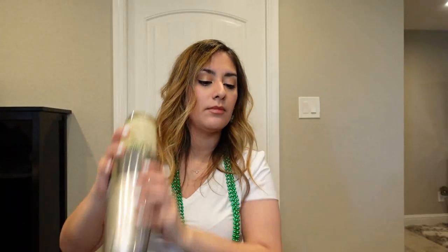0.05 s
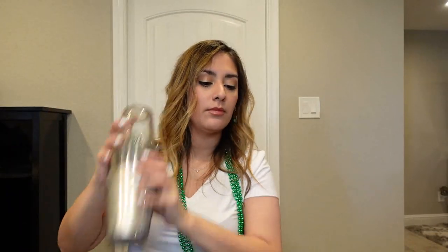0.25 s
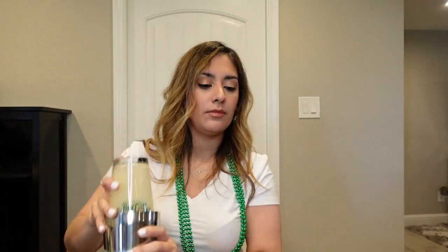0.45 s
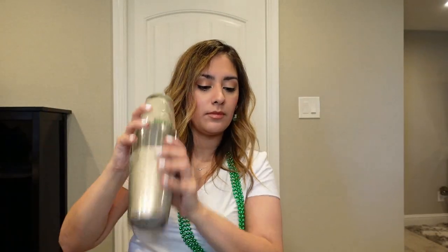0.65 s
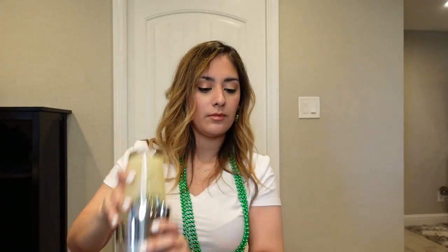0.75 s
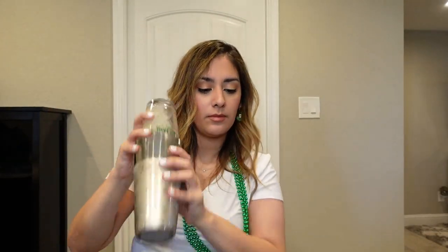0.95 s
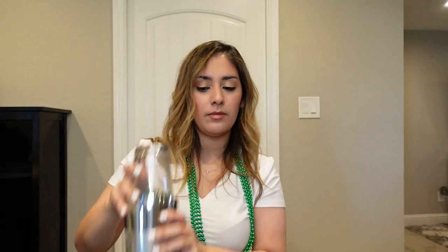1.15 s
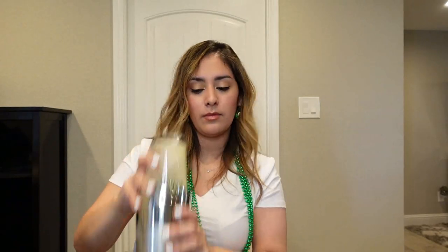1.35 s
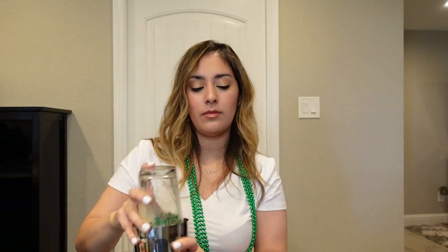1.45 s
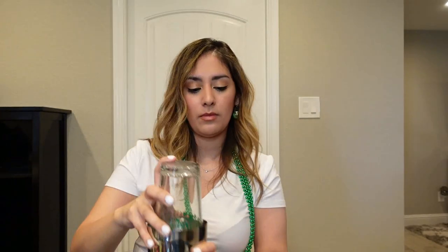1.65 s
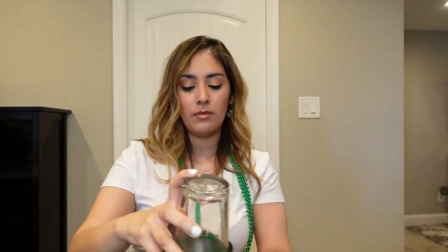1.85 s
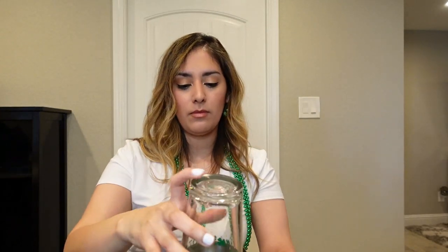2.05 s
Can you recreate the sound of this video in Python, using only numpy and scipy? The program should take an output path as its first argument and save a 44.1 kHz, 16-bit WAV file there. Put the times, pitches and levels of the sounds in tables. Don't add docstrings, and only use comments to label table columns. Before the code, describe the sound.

Fast cocktail shaking, ice cubes clattering against steel and glass, ending with a few last small rattles

```python
import sys
import numpy as np
from scipy import signal
from scipy.fft import rfft, irfft
from scipy.io import wavfile

SR = 44100
rng = np.random.default_rng(int(sys.argv[2]) if len(sys.argv) > 2 else 0)


def boost_factor(decibels):
    exponent = np.asarray(decibels, float) / 20
    return 10 ** exponent


def master_out(mix):
    frames = np.transpose(np.atleast_2d(mix))
    ceiling = np.clip(frames, -1, 1)
    pcm = np.round(ceiling * 32767).astype(np.int16)
    wavfile.write(sys.argv[1], SR, pcm)


N = 92742

# pitch_hz, level_db (per Hz)
HUM = [(25, -11), (60, -5.5), (90, -6.5), (200, 6.5), (500, 5), (2000, -19), (6000, -23), (15000, -33)]
HUM_DB, HUM_SIDE_DB = -55.5, -11.5

# start_s, tin_db, glass_db, chips_db, slosh_db
STROKES = [(0.0, -23.5, -23.5, -27, -34), (0.063, -25.5, -29, -27.5, -35.5), (0.186, -22.5, -29, -35, -63),
           (0.229, -20, -22.5, -25.5, -42), (.38, -21.5, -31, -28.5, -67), (0.426, -22.5, -29, -36, -39.5),
           (0.555, -18, -19, -27.5, -41), (0.575, -22.5, -24.5, -26, -26.5), (0.719, -21.5, -29, -30, -68),
           (0.867, -20.5, -28, -26.5, -52), (0.882, -19.5, -22.5, -24.5, -36),
           (1.016, -21.5, -30, -25, -70), (1.185, -22.5, -21, -25.5, -37), (1.321, -60, -30, -55, -44),
           (1.358, -23.5, -30.5, -29.5, -69), (1.52, -22, -24.5, -34.5, -28), (1.638, -72, -45, -40, -38),
           (1.687, -39.5, -47, -49, -45), (1.792, -35.5, -40, -52.5, -37)]
RISE_S, SETTLED_S = 0.0086, 1.875
FLIGHT_S, FLIGHT_FADE_DB_S = 0.0054, 497
TIN_FADE_DB_S, GLASS_FADE_DB_S, CHIP_FADE_DB_S, SLOSH_FADE_DB_S = 26, 88, 50.5, 119.5

# pitch_hz, level_db, t60_s
TIN = [(2160, -2.5, 0.033), (2340, -6.5, 0.025), (2690, -2.5, 0.0035), (3000, -1.5, 0.0063),
       (3224, -3, 0.013), (3345, -4, 0.0049), (3750, -6.5, 0.0073), (4190, -6.5, 0.015),
       (5390, -7.5, 0.0041), (6700, -6, 0.0014)]
# pitch_hz, level_db, t60_s
GLASS = [(1008, -4, 0.018), (1220, -4, 0.069), (1430, 3, 0.0073), (1685, 2, 0.016), (1816, -1.5, 0.015),
         (2020, 2.5, 0.027)]
# pitch_hz, level_db, t60_s
SLOSH = [(260, -26, .03), (364, -6, 0.026), (516, 1.5, 0.064), (561, 7.5, 0.045), (787, 10, 0.0062)]
TIN_PER_S, GLASS_PER_S, CHIPS_PER_S, SLOSH_PER_S = 1300, 900, 2200, 540
UNEVEN_DB, CHIP_UNEVEN_DB = 2.5, 1
PATCHY_DB, PATCHES_PER_S = 3.5, 40
CHIP_LOW_HZ, CHIP_HIGH_HZ = 4830, 13700
CHIP_CYCLES, CHIP_TILT_DB = 7.8, -4.5
TIN_ABOVE_HZ, SPRAY_ABOVE_HZ, SPRAY_FADE_DB_S = 1250, 8500, 72
STIR_S, STIR_DEPTH = 0.0058, 0.63

# start_s, level_db (peak), pitch_hz
EARLY_KNOCKS = [(0.1, -4, 2160), (0.1114, -2, 3400), (0.1425, -3, 3720), (0.1895, 1.5, 3220),
                (0.2282, -1.5, 1850), (0.2381, -7, 1930), (0.2584, -10, 1650), (0.303, -1, 2310),
                (0.3284, -5, 2300), (0.378, 0, 3300), (0.4296, -5, 2150), (0.4496, -4, 3120),
                (0.4612, -2.5, 4170), (0.4695, 4.5, 3260), (0.5109, -0.5, 3200), (0.5549, -0.5, 2900),
                (0.6008, -2, 2330), (0.643, -7, 3800), (0.6744, -11, 3000), (0.7642, -2.5, 3080),
                (0.7819, 3, 3480), (0.8268, 1.5, 3100), (0.8598, -1, 3520), (0.9149, -12, 1560)]
# start_s, level_db (peak), pitch_hz
LATE_KNOCKS = [(0.9374, 0, 2840), (0.9424, -5, 2930), (1.0134, -18, 3230), (1.0635, -2, 4190),
               (1.0899, -6, 3070), (1.1164, -4, 1980), (1.1573, -6.5, 2130), (1.2764, -12, 1800),
               (1.3104, -8, 2300), (1.3603, 4, 4220), (1.4002, -4.5, 1870), (1.4194, -1, 4340),
               (1.502, -6, 1910), (1.5209, -2.5, 2380), (1.5434, -12, 2930), (1.5644, -1.5, 2810),
               (1.6332, -13, 1670), (1.6494, -5, 2280), (1.7464, -11.5, 2200)]
# start_s, level_db (peak), pitch_hz
SMALL_KNOCKS = [(0.016, -17, 1790), (0.0187, -6, 2330), (0.0643, -13, 2100), (0.0956, 1.5, 5320),
                (0.1602, -19, 3270), (0.1955, -9.5, 2160), (0.2057, -7, 3060), (0.4002, -11, 2190),
                (0.4076, -16, 2400), (0.4356, -2.5, 2220), (0.5295, -5.5, 2330), (0.5621, -4, 2950),
                (0.5763, -5, 3240), (0.689, -5, 3100), (0.7216, -21, 2900), (0.7343, -4, 3120),
                (0.8335, -21, 3100), (0.8702, -4.5, 3210), (0.891, -7, 3170), (1.0231, -14, 3420),
                (1.0447, -14, 2040), (1.067, -10, 3070), (1.1207, -10.5, 2160), (1.3234, -19, 4360),
                (1.367, -15, 3330), (1.3845, -23, 2120), (1.424, -4, 4220), (1.477, -8, 3200),
                (1.4868, -16, 3200), (1.5293, -12, 2250), (1.5317, -5, 4270), (1.5551, -5, 2210),
                (1.5611, -0.5, 3090), (1.6333, -8, 2830), (1.7042, -25, 1640), (1.712, -31, 1710),
                (1.763, -20, 2050), (1.812, -19.5, 1440), (1.8378, -19, 2020), (1.8877, -39, 1830),
                (1.954, -38, 1710), (1.9819, -45, 1720), (2.019, -38, 1970), (2.041, -41, 2150),
                (2.0539, -33, 2180), (2.0617, -37, 2280)]
KNOCK_CYCLES, KNOCK_DB, SMALL_KNOCK_DB = 22, 3.5, 2
SWELL_S, CRACK_DB = 0.0008, -25.5

# start_s, level_db (peak), pitch_hz
TICKS = [(0.0643, -6, 8100), (0.2556, -28, 5520), (0.382, -4.5, 6700), (0.4289, -9, 7200),
         (0.554, -14, 6540), (0.576, -12, 6640), (0.7196, -2.5, 6350), (0.8924, -16, 8400),
         (0.9207, -8, 6000), (0.9424, -7, 7100), (0.9717, -6.5, 6150), (1.0144, -7, 7300),
         (1.064, -10.5, 7000), (1.17, -7.5, 7500), (1.1977, -15, 5530), (1.2426, -10.5, 6600),
         (1.276, -14.5, 5970), (1.3256, -9, 5760), (1.333, -12.5, 7900), (1.3842, -5.5, 6750),
         (1.502, -21.5, 6700), (1.5215, -7.5, 6450), (1.533, -18, 7560), (1.5459, -8, 5670),
         (1.65, -13, 6000), (1.8085, -12, 4100), (1.9035, -30.5, 7000)]
# start_s, level_db (peak), pitch_hz
SMALL_TICKS = [(0.0772, -12, 9900), (0.1447, -15, 5520), (0.1892, -25, 5710), (0.2061, -19, 6690),
               (0.3781, -17.5, 6340), (0.4616, -18, 6020), (0.7503, -13, 5960), (1.043, -21, 6340),
               (1.0689, -11.5, 6950), (1.1162, -10, 5360), (1.3609, -12.5, 6750), (1.3673, -26.5, 6930),
               (1.4863, -22, 6300), (1.5277, -18, 5520), (1.5636, -16, 6400), (1.6987, -26, 6200),
               (2.0392, -52, 6350), (2.0522, -52, 6450)]
TICK_T60_S, TICK_DB, SMALL_TICK_DB = 0.0091, 0.5, 4

# start_s, level_db (peak), pitch_hz, t60_s
CLINKS = [(0.1105, -6.5, 3980, 0.021), (0.1447, -18, 4180, 0.033), (0.4616, -10.5, 4190, 0.017),
          (1.0447, -12, 2120, 0.064), (1.0637, -10.5, 4190, 0.023), (1.1835, -0.5, 1834, 0.034),
          (1.4413, -13, 2153, 0.051), (1.747, -17.5, 690, 0.0095), (1.798, -15.5, 844, 0.018),
          (1.81, -24, 685, 0.019), (1.837, -17.5, 3070, 0.027), (1.904, -31, 637, 0.04)]
CLINK_SWELL_S = 0.0012

# start_s, level_db (peak), t60_s
THUDS = [
    (.8852, -5, .008),
    (1.1797, -1.5, .06),
    (1.2102, -6, .006),
    (1.6987, -2, .009),
    (1.8085, -3.5, .009),
]
# pitch_hz, level_db, lasting_share (share of the ring that lasts, 0-1)
BASE = [(596, -15, 0.16), (1255, -9.5, 0.42), (1677, -4, 0.51), (1873, -11, 1), (2300, -15, 0.075),
        (4440, -17, 0.07)]
THUD_ABOVE_HZ, CONTACT_HZ = 1620, 7300

# pitch_hz, t60_s
KITCHEN_T60 = [(250, 0.22), (1000, 0.55), (3000, 0.52), (8000, 0.31), (15000, 0.41)]
# pitch_hz, likeness (0-1)
LIKENESS = [(250, 0.95), (1000, 0.89), (4000, 0.55), (12000, 0.051)]
KITCHEN_DB, FIRST_ECHO_S, ECHO_TILT_DB = -5, 0.0024, 0.5
RADIATES_ABOVE_HZ, PAN_DB = 430, 0.35


def at_hz(points, hz):
    table = np.array(points)
    return np.interp(np.log(hz), np.log(table[:, 0]), table[:, 1])


def rms_one(x):
    return x / np.sqrt(np.mean(x ** 2) + 1e-20)


def filtered(x, order, hz, kind):
    return signal.sosfilt(signal.butter(order, hz, kind, fs=SR, output="sos"), x)


def above(x, hz):
    return signal.sosfiltfilt(signal.butter(2, hz, "high", fs=SR, output="sos"), x)


def ring(clicks, hz, t60):
    r = boost_factor(-60 / (max(t60, 1e-4) * SR))
    w = 2 * np.pi * min(hz, 19000) / SR
    return signal.lfilter([0, np.sin(w)], [1, -2 * r * np.cos(w), r * r], clicks + 1e-18)


def hum():
    colour = boost_factor(at_hz(HUM, np.maximum(np.fft.rfftfreq(N, 1 / SR), 1)))
    mid, side = rms_one(irfft(rfft(rng.standard_normal((2, N))) * colour, N))
    return boost_factor(HUM_DB) * (mid + boost_factor(HUM_SIDE_DB) * side * [[1], [-1]])


def surge(column, fade_db_s):
    t, power = np.arange(N) / SR, 0
    next_starts = [row[0] for row in STROKES[1:]] + [SETTLED_S]
    for row, following in zip(STROKES, next_starts):
        start = row[0]
        db = row[column] - fade_db_s * np.maximum(t - start, 0)
        db = db - FLIGHT_FADE_DB_S * np.maximum(t - following + FLIGHT_S, 0)
        rise = np.clip((t - start) / RISE_S + (start == 0), 0, 1)
        power = power + rise ** 2 * boost_factor(2 * db)
    return np.sqrt(power)


def swarm(modes, per_s, uneven_db=UNEVEN_DB):
    sizes = boost_factor(uneven_db * np.minimum(rng.exponential(1, N), 4.0))
    hits = sizes * (rng.random(N) < per_s / SR)
    step = np.arange(N) / SR * PATCHES_PER_S
    total = 0
    for hz, db, t60 in modes:
        grip_db = PATCHY_DB * np.interp(step, np.arange(400), rng.standard_normal(400))
        blows = boost_factor(db + grip_db) * hits * rng.standard_normal(N) / np.sqrt(t60)
        total = total + ring(blows, hz, t60)
    return rms_one(total)


def rattle():
    pitches = np.geomspace(CHIP_LOW_HZ, CHIP_HIGH_HZ, 12)
    chips = [(hz, CHIP_TILT_DB * np.log2(hz / CHIP_LOW_HZ), CHIP_CYCLES / hz) for hz in pitches]
    crunch = swarm(chips, CHIPS_PER_S, CHIP_UNEVEN_DB)
    spray = above(crunch, SPRAY_ABOVE_HZ)
    tin = above(swarm(TIN, TIN_PER_S), TIN_ABOVE_HZ)
    return (surge(column=1, fade_db_s=TIN_FADE_DB_S) * tin
            + surge(column=2, fade_db_s=GLASS_FADE_DB_S) * swarm(GLASS, GLASS_PER_S)
            + surge(column=3, fade_db_s=CHIP_FADE_DB_S) * (crunch - spray)
            + boost_factor(0.5) * surge(column=3, fade_db_s=CHIP_FADE_DB_S + SPRAY_FADE_DB_S) * spray
            + surge(column=4, fade_db_s=SLOSH_FADE_DB_S) * swarm(SLOSH, SLOSH_PER_S))


def stir():
    jolts = np.zeros(N)
    s, db, _ = np.transpose(list(EARLY_KNOCKS) + list(LATE_KNOCKS))
    jolts[(s * SR).astype(int)] = boost_factor(db)
    settling = signal.lfilter([1], [1, -np.exp(-1 / (STIR_S * SR))], jolts)
    return rms_one(1 + STIR_DEPTH * settling)


def knocks():
    out, click = np.zeros(N + 2000), np.eye(1, 2000)[0]
    swell = 1 - np.exp(-np.arange(2000) / SR / SWELL_S)
    small = [(s, db + SMALL_KNOCK_DB, hz) for s, db, hz in SMALL_KNOCKS]
    for s, db, hz in list(EARLY_KNOCKS) + list(LATE_KNOCKS) + small:
        tone = boost_factor(-3.0) * ring(click, hz, KNOCK_CYCLES / hz)
        tone = tone + boost_factor(-8) * ring(click, 1.16 * hz, 18 / hz)
        tone = tone + boost_factor(-9) * ring(click, 0.5 * hz, 11.0 / hz)
        crack = boost_factor(CRACK_DB) * ring(click, 2.36 * hz, 8.5 / hz)
        i = int(s * SR)
        out[i:i + 2000] += boost_factor(db + KNOCK_DB) * (swell * tone + crack)
    return filtered(out[:N], 1, TIN_ABOVE_HZ, "high")


def ticks():
    out, fade = np.zeros(N + 800), boost_factor(-60 * np.arange(800) / SR / TICK_T60_S)
    rows = list(TICKS) + [(s, db + SMALL_TICK_DB, hz) for s, db, hz in SMALL_TICKS]
    for (s, db, hz), noise in zip(rows, rng.standard_normal((len(rows), 800))):
        crunch = filtered(noise * fade, 2, [0.32 * hz, min(1.227 * hz, 19000)], "band")
        i = int(s * SR)
        out[i:i + 800] += boost_factor(db + TICK_DB) * crunch / np.abs(crunch).max()
    return out[:N]


def clinks():
    out, t = np.zeros(N + 4000), np.arange(4000) / SR
    swell = 1 - np.exp(-t / CLINK_SWELL_S)
    for s, db, hz, t60 in CLINKS:
        pair = np.sin(2 * np.pi * hz * t) + 0.22 * np.sin(2 * np.pi * 1.06 * hz * t)
        i = int(s * SR)
        out[i:i + 4000] += boost_factor(db - 60 * t / max(t60, 0.003)) * swell * pair
    return out[:N]


def thuds():
    out, click = np.zeros(N + 4000), np.eye(1, 4000)[0]
    for s, db, t60 in THUDS:
        i = int(s * SR)
        for hz, mode_db, share in BASE:
            mode_t60 = 0.0092 + t60 * np.clip(share, 0, 1)
            out[i:i + 4000] += boost_factor(db + mode_db) * ring(click, hz, mode_t60)
    return filtered(out[:N], 1, [THUD_ABOVE_HZ, CONTACT_HZ], "band")


def kitchen(x):
    t, echo = np.arange(SR // 2) / SR, 0
    edges = 150 * 2 ** np.arange(0, 7.5)
    for low, high in zip(edges, edges[1:]):
        mid, side = filtered(rng.standard_normal((2, len(t))), 2, [low, high], "band")
        hz = np.sqrt(low * high)
        alike = np.clip(at_hz(LIKENESS, hz), 0, 1)
        decay = boost_factor(ECHO_TILT_DB * np.log2(hz / 2000) - 60 * t / at_hz(KITCHEN_T60, hz))
        echo = echo + decay * (np.sqrt(1 + alike) * mid + np.sqrt(1 - alike) * side * [[1], [-1]])
    echo = echo * np.clip(t / FIRST_ECHO_S - 1, 0, 1)
    echo = echo / np.sqrt(np.sum(echo ** 2) / 2)
    return signal.fftconvolve(x[None], echo, axes=1)[:, :N]


def scene():
    ice = boost_factor(-1.0) * stir() * rattle() + knocks() + clinks() + ticks() + thuds()
    shaker = filtered(ice, 4, RADIATES_ABOVE_HZ, "high")
    pan = boost_factor(np.array([[PAN_DB], [-PAN_DB]]))
    return (shaker + boost_factor(KITCHEN_DB) * kitchen(shaker)) * pan + hum()


def band_limit(x):
    return signal.sosfilt(signal.butter(12, 17000, fs=SR, output="sos"), x)


def record(dry):
    ceiling, top_hz = 0.7, 16250
    squeeze = filtered(ceiling * np.tanh(dry / ceiling) - dry, 4, 400, "high")
    cut = signal.sosfilt(signal.cheby2(16, 60, top_hz, fs=SR, output="sos"), dry + squeeze)
    return band_limit(cut)


dry = scene()
out = record(dry)
master_out(out)
```